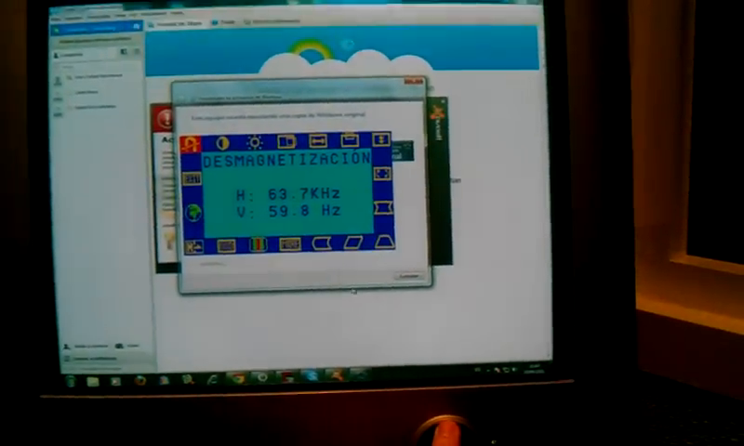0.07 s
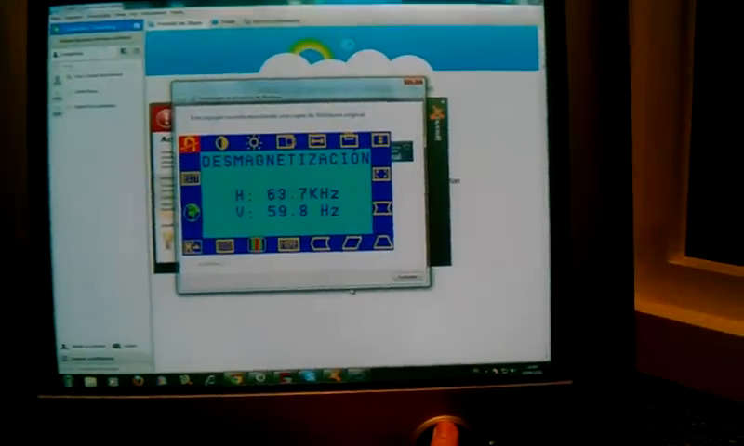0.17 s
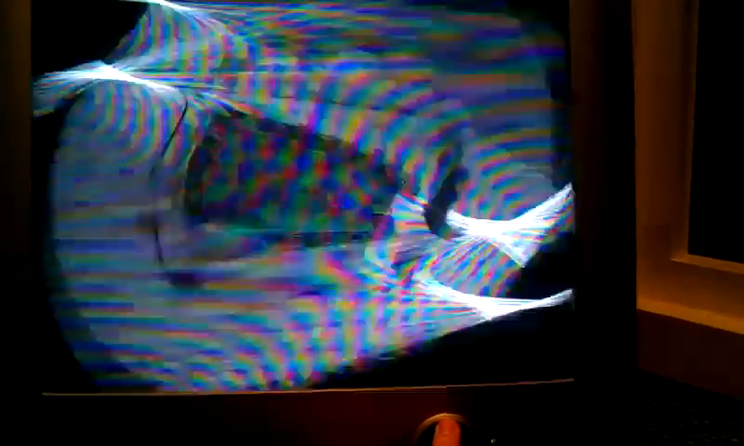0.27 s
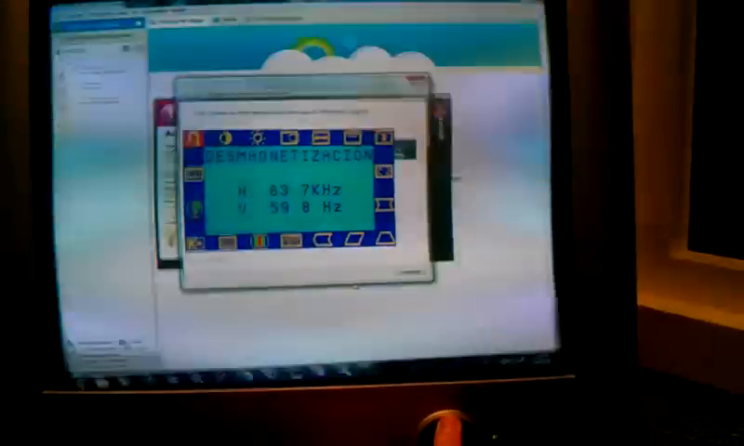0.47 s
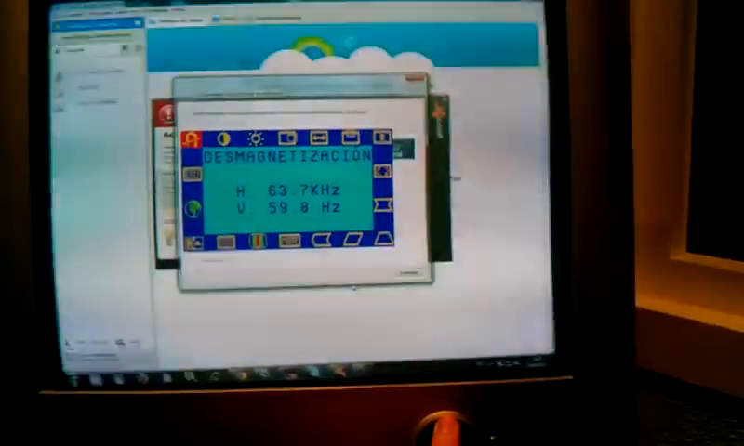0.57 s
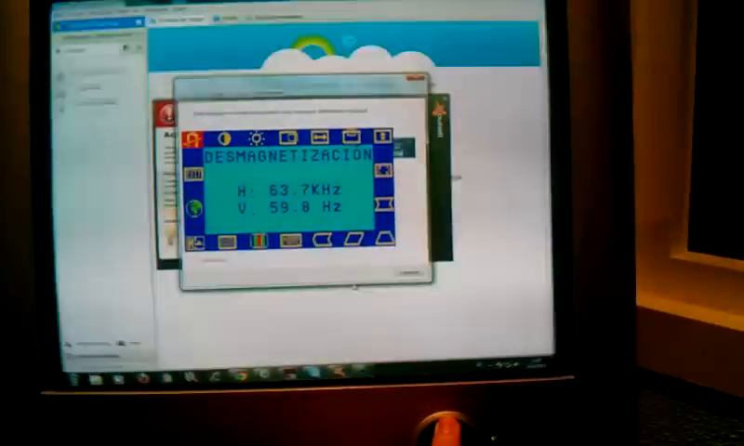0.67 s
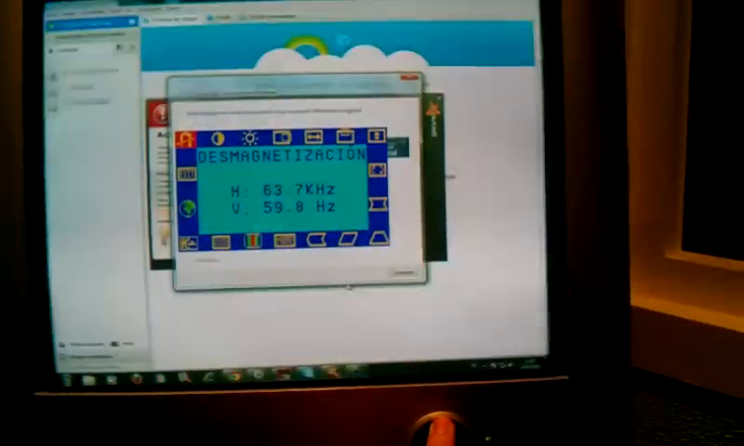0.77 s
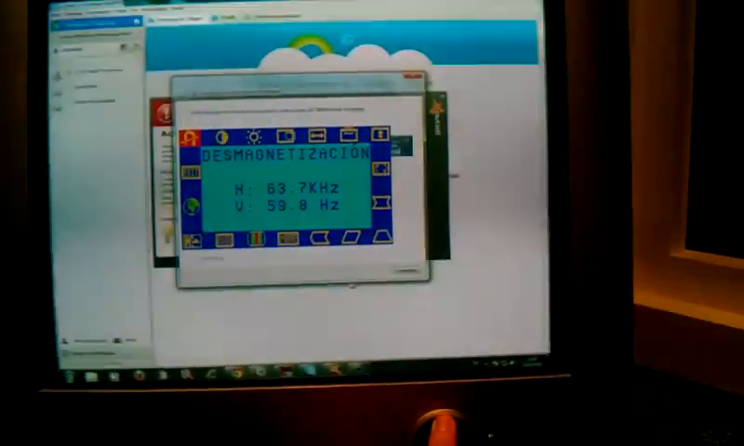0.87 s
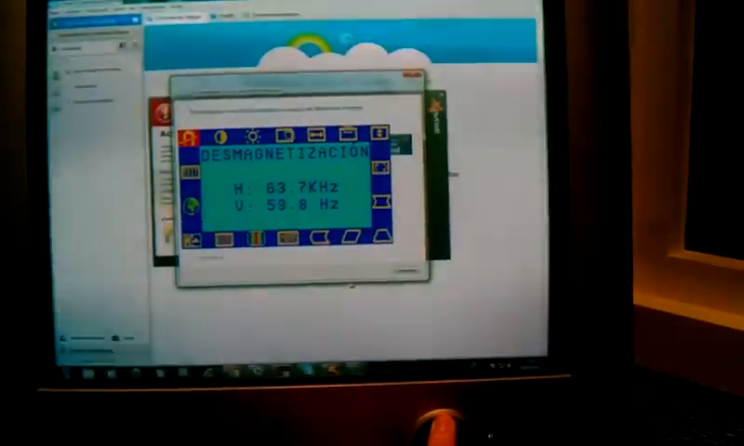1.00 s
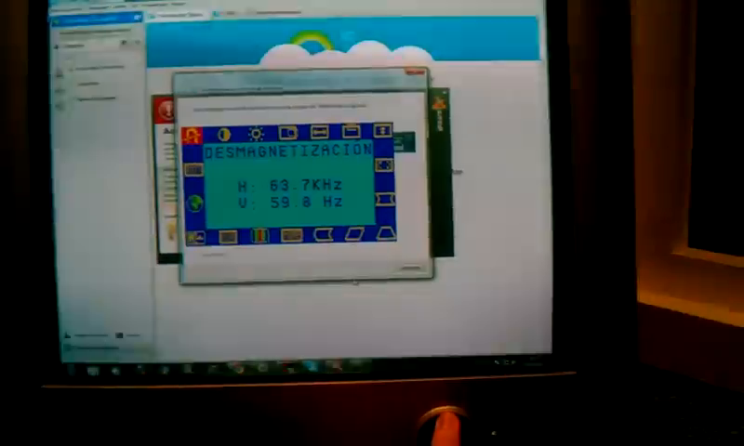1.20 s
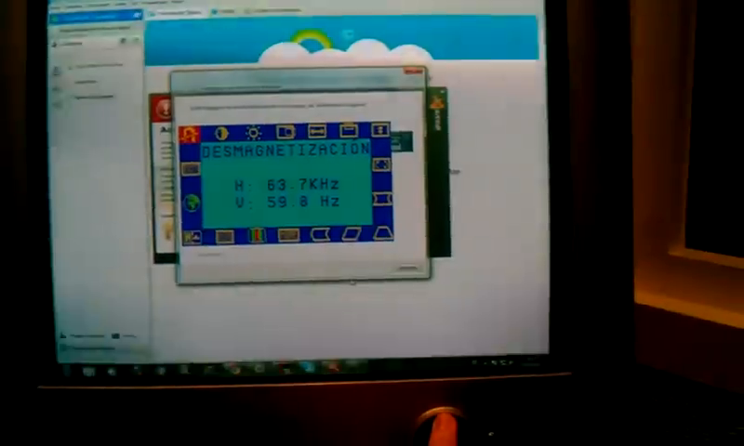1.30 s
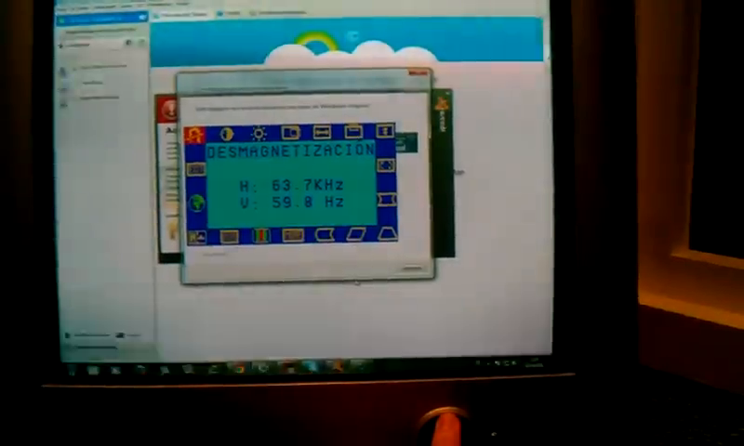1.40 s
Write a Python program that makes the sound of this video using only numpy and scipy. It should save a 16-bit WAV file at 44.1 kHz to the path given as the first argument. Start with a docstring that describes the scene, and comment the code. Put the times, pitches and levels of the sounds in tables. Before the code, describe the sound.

A tube monitor degausses close by in a small, quiet room. A button snaps and a relay instantly answers with a bright metallic click. A faint low hum swells and fades, then the relay releases with a duller knock.

```python
"""Degaussing a tube monitor

In a small, quiet room a button snaps and a relay pulls in with a bright metallic click.
The coil hums briefly as its current dies away, then the relay drops out with a duller knock
in the plastic cabinet. Each click rings cabinet, relay frame and room. Faint hiss and hum underneath."""
import sys
import numpy as np
from scipy import signal
from scipy.fft import rfft, irfft, next_fast_len
from scipy.io import wavfile

SR = 44100
rng = np.random.default_rng(int(sys.argv[2]) if len(sys.argv) > 2 else 0)


def generate_wav(sig):
    """Save sig (samples, or channels by samples) to the path in sys.argv[1] as 16-bit PCM at SR."""
    pcm = np.round(np.clip(np.atleast_2d(sig).T, -1, 1) * 32767).astype(np.int16)
    wavfile.write(sys.argv[1], SR, pcm)


N = 63945
TIME = np.arange(N) / SR

# contacts of each click: t/s, relative knock level/dB, relative tick level/dB
BUTTON_CONTACTS = [(0.2034, -10, -7.5), (0.2080, -6, -35), (0.222, -13, -29)]
PULL_IN_CONTACTS = [(0.2503, -20, -6.5), (0.2530, -4, -4)]
DROP_OUT_CONTACTS = [(1.0504, -39, -11.5), (1.052, -6, -13), (1.0551, -6, -15)]
# click spectra: f/Hz, relative level/dB
BUTTON_SPECTRUM = [(60, -53), (200, -29), (380, -26), (530, -1), (730, -5.5), (900, 0.5), (1500, -5.5),
                   (1850, -0.5), (2200, -8.5), (3700, -13.5), (4800, -21.5), (7500, -17.5), (9500, -9),
                   (11000, -31), (13000, -44), (15000, -27)]
PULL_IN_SPECTRUM = [(60, -55), (200, -15.5), (380, -15.5), (600, -20), (1200, -6), (2400, -20.5),
                    (3100, -9), (4100, -17), (4900, -10.5), (6300, -21.5), (7250, -11.5), (7600, -6),
                    (8200, 1.5), (9800, -10), (11300, -11), (12300, -42), (15200, -23.5)]
DROP_OUT_SPECTRUM = [(60, -41), (200, -39), (380, -18), (540, -3), (730, -3), (900, 0.5), (1600, -8),
                     (1950, -17.5), (3500, -21.5), (5200, -19.5), (6300, -26.5), (7700, -12), (10000, -21),
                     (12500, -37), (16000, -36)]
# modes of the cabinet and the relay's metal frame: f/Hz, relative level/dB, T60/s
CABINET_MODES = [(562, -2, .45), (674, -6, .45), (812, -2, .48), (835, -4, .55), (890, -5, .45),
                 (938, -1, .5), (1020, -6, .4), (1120, -7, .5), (1194, -1, .48), (1250, -6, .4),
                 (1391, -7, .4), (1565, -8, .4), (1863, -7, .38), (2022, -13, .38), (2212, -14, .35),
                 (2692, -15, .35)]
RELAY_MODES = [(3063, -13, .38), (7447, -6, .32), (8146, 0, .3), (8256, -1, .3), (8985, -7, .3)]
# room decay: f/Hz, T60/s
ROOM_T60 = [(200, 0.59), (600, 0.48), (1200, 0.51), (2500, 0.51), (5000, 0.33), (8200, 0.32), (11000, 0.27),
            (15000, 0.19)]
# coil hum envelope: t/s, level/dB
COIL_ENVELOPE = [(.25, -60.5), (.3, -57.5), (.375, -47.5), (.415, -57.5), (.455, -61), (.56, -70),
                 (.8, -74)]
# coil partials, near multiples of twice mains frequency: f/Hz, relative level/dB, envelope lag/s
COIL_PARTIALS = [(102, -17, -0.066), (203, -3, 0.031), (307.8, -11.5, 0.042), (393.3, -9.5, -0.03),
                 (504, -1.5, -0.01), (600, -13, -0.0047), (696, -11, -0.003)]
# spectra of cabinet rustle and room hiss: f/Hz, relative density/dB
RUSTLE_SPECTRUM = [(150, -16.5), (500, -0.5), (1300, -6.5), (2500, -14.5), (6000, -28)]
HISS_SPECTRUM = [(25, -3.5), (50, -9.5), (95, -10.5), (135, -8.5), (170, -11), (230, -6), (300, -10),
                 (450, -13.5), (650, -10.5), (900, -12.5), (1400, -18), (2400, -21), (4000, -22.5),
                 (6200, -23.5), (7800, -20), (10000, -23), (12500, -27.5), (15500, -25.5)]
# background hum lines: f/Hz, level/dB
HUM_LINES = [(120, -72), (145, -74.5), (221, -69.5), (345, -76.5)]


def button_and_relay():
    """Button snap, relay pull-in and relay drop-out in one room."""
    room = room_tail()
    button = click(room, BUTTON_CONTACTS, BUTTON_SPECTRUM, gain_db=14, knock_s=0.0054, tick_s=0.011,
                   knock_room_db=-6.5, tick_room_db=-6, cabinet_db=-45, relay_db=-69)
    pull_in = click(room, PULL_IN_CONTACTS, PULL_IN_SPECTRUM, gain_db=12, knock_s=0.004, tick_s=0.0017,
                    knock_room_db=-5, tick_room_db=-3, cabinet_db=-48, relay_db=-37.5)
    drop_out = click(room, DROP_OUT_CONTACTS, DROP_OUT_SPECTRUM, gain_db=14.5, knock_s=0.0036,
                     tick_s=0.0029, knock_room_db=-5.5, tick_room_db=-9.5, cabinet_db=-42, relay_db=-59)
    return button + pull_in + drop_out


def click(room, contacts, spectrum, gain_db, knock_s, tick_s, knock_room_db, tick_room_db,
          cabinet_db, relay_db, crossover_hz=3670):
    """Each contact gives a low knock and a high tick; the first rings cabinet, relay frame and room."""
    first_contact = impulse(contacts[0][0], 0)
    bands = (1, "low", knock_s, knock_room_db), (2, "high", tick_s, tick_room_db)
    impact = 0
    for column, side, decay_s, room_db in bands:
        direct = sum(convolve(impulse(row[0], row[column]), rattle(decay_s)) for row in contacts)
        reflected = from_db(room_db) * convolve(first_contact, room)
        crossover = signal.butter(3, crossover_hz, side, fs=SR, output="sos")
        impact += signal.sosfilt(crossover, direct + reflected)
    body = from_db(cabinet_db) * ringing(CABINET_MODES) + from_db(relay_db) * ringing(RELAY_MODES)
    return from_db(gain_db) * coloured(impact, spectrum) + convolve(first_contact, body)


def rattle(decay_s):
    """Dense, quickly damped vibration after a contact; near-flat spectrum, unit energy."""
    decay = np.exp(-np.minimum(TIME / decay_s, 50))
    burst = rng.standard_normal(N) * decay
    for _ in range(4):
        whitened = irfft(np.exp(1j * np.angle(rfft(burst))), N)
        burst = whitened * decay ** 0.25
    return burst / np.linalg.norm(burst)


def ringing(modes, rise_s=0.0013):
    """Impulse response of damped modes with a short build-up."""
    rise = 1 - np.exp(-TIME / rise_s)
    return rise * sum(from_db(db - 60 * TIME / t60_s) * np.sin(2 * np.pi * (hz * TIME + rng.random()))
                      for hz, db, t60_s in modes)


def room_tail(delay_s=0.0046, build_s=0.0022):
    """Diffuse reflections: build up, then die faster in the treble."""
    white = rfft(rng.standard_normal(N))
    hz = np.arange(N // 2 + 1) * SR / N
    edges_hz = np.geomspace(60, 20000, 18)
    tail = 0
    for low, high in zip(edges_hz, edges_hz[1:]):
        band = irfft(white * (hz >= low) * (hz < high), N)
        t60_s = at_hz(ROOM_T60, np.sqrt(low * high))
        tail += band * from_db(-60 * TIME / t60_s)
    tail *= 1 - np.exp(-np.maximum(TIME - delay_s, 0) / build_s)
    return tail / np.linalg.norm(tail)


def coil(rustle_db=-58.5, rustle_fade_db_per_s=26):
    """From pull-in the coil shakes the cabinet: mains harmonics swell and fade over a faint rustle."""
    times_s, levels_db = np.transpose(COIL_ENVELOPE)
    elapsed_s = TIME - PULL_IN_CONTACTS[0][0]
    hum = 0
    for hz, db, lag_s in COIL_PARTIALS:
        envelope = from_db(db + np.interp(TIME - lag_s, times_s, levels_db))
        hum += envelope * wavering_tone(hz, depth=0.17, waver_hz=10)
    rustle = from_db(rustle_db - rustle_fade_db_per_s * elapsed_s) * shaped_noise(RUSTLE_SPECTRUM)
    return (hum + rustle) * (elapsed_s > 0)


def background(hiss_db=-60.5):
    """Steady hiss and faint, wavering hum lines."""
    hum = sum(from_db(db) * wavering_tone(hz, depth=0.24, waver_hz=5.4) for hz, db in HUM_LINES)
    return from_db(hiss_db) * shaped_noise(HISS_SPECTRUM) + hum


def wavering_tone(hz, depth, waver_hz):
    """Sine with slowly wandering level and phase."""
    lowpass = signal.butter(2, waver_hz, fs=SR, output="sos")
    drift = signal.sosfilt(lowpass, rng.standard_normal((2, 2 * N)))[:, N:]
    phase = 2 * np.pi * (hz * TIME + rng.random())
    return (1 + depth * unit_rms(drift[0])) * np.sin(phase) + depth * unit_rms(drift[1]) * np.cos(phase)


def shaped_noise(spectrum):
    """Coloured noise, unit rms."""
    return unit_rms(coloured(rng.standard_normal(N), spectrum))


def coloured(x, spectrum):
    """Minimum-phase filter with the given spectrum."""
    size = 2 * next_fast_len(N)
    gain = from_db(at_hz(spectrum, np.arange(size // 2 + 1) * SR / size))
    cepstrum = irfft(np.log(gain))
    cepstrum[1:size // 2] *= 2  # fold to causal
    cepstrum[size // 2 + 1:] = 0
    return irfft(rfft(x, size) * np.exp(rfft(cepstrum)))[:N]


def impulse(t_s, db):
    """One-sample push."""
    return from_db(db) * (np.arange(N) == int(t_s * SR))


def convolve(x, response):
    """Apply an impulse response."""
    return signal.fftconvolve(x, response)[:N]


def at_hz(table, hz):
    """Interpolate over log frequency."""
    table_hz, values = np.transpose(table)
    return np.interp(np.log(np.maximum(hz, 1)), np.log(table_hz), values)


def unit_rms(x):
    """Scale to rms 1."""
    return x / np.sqrt(np.mean(x ** 2) + 1e-20)


def from_db(db):
    """dB to gain."""
    return 10 ** (np.asarray(db) / 20)


def scene():
    """Mono sum of all sources."""
    return (button_and_relay() + coil() + background())[None]


def record(dry):
    """Steep elliptic low-pass."""
    cutoff_hz = 15750
    return signal.sosfilt(signal.ellip(10, 0.2, 70, cutoff_hz, fs=SR, output="sos"), dry)


dry = scene()
out = record(dry)
generate_wav(out)
```